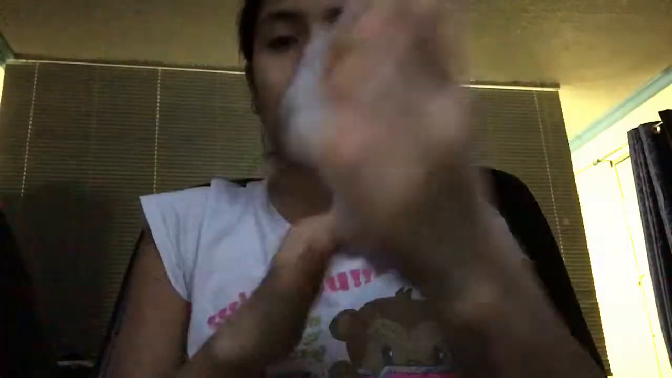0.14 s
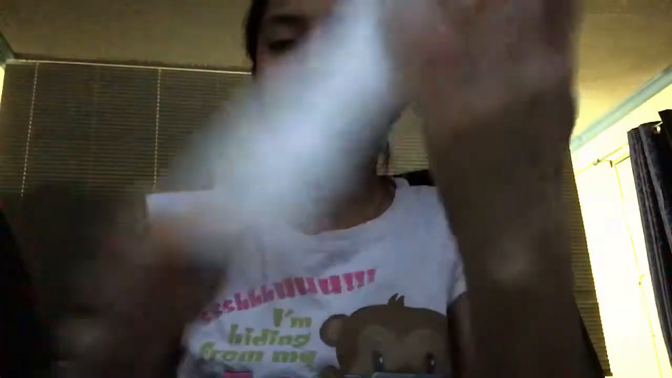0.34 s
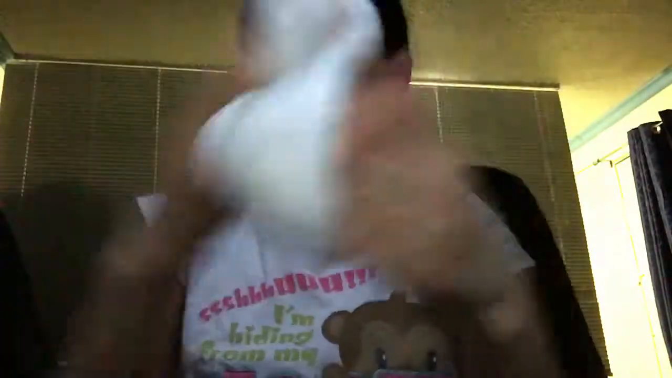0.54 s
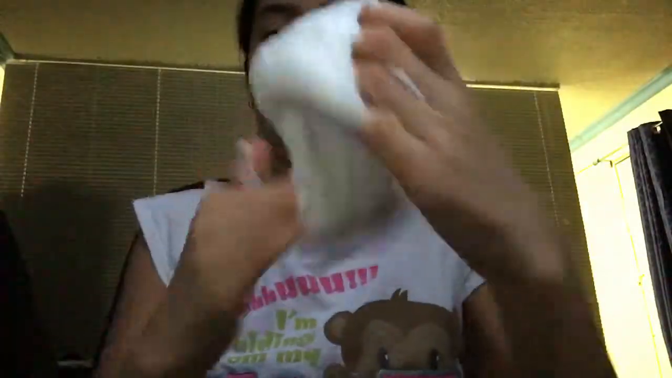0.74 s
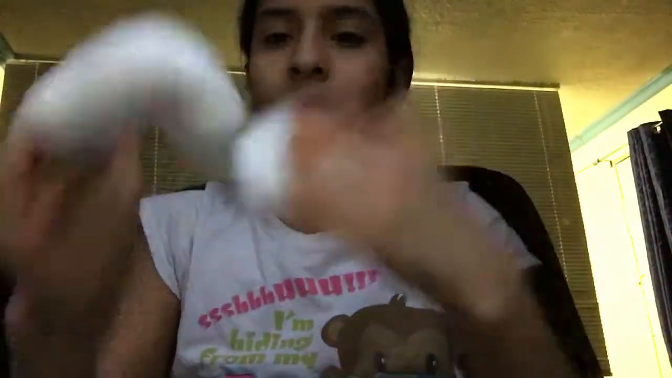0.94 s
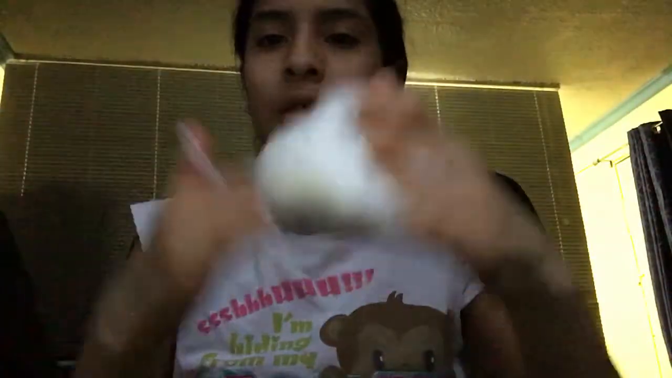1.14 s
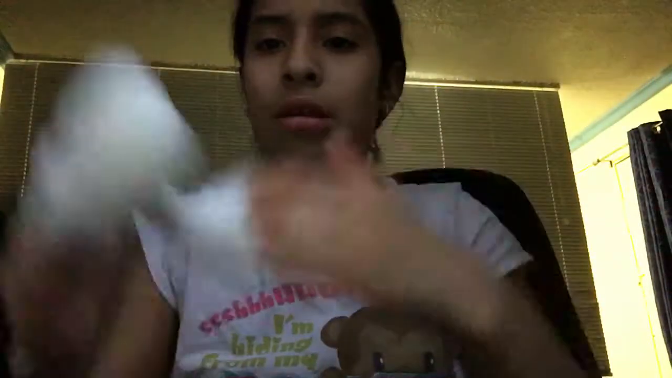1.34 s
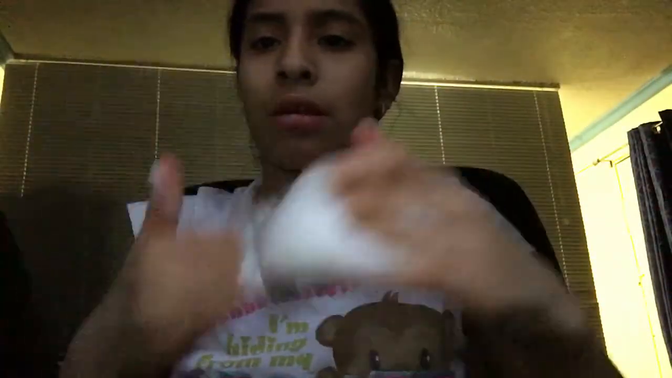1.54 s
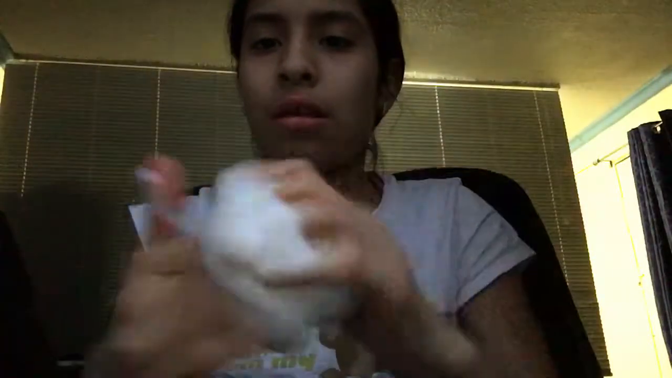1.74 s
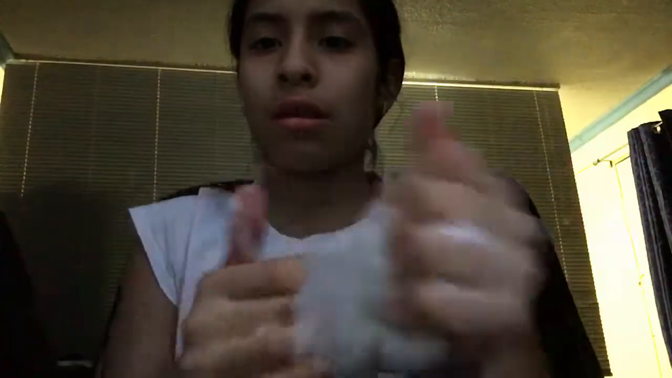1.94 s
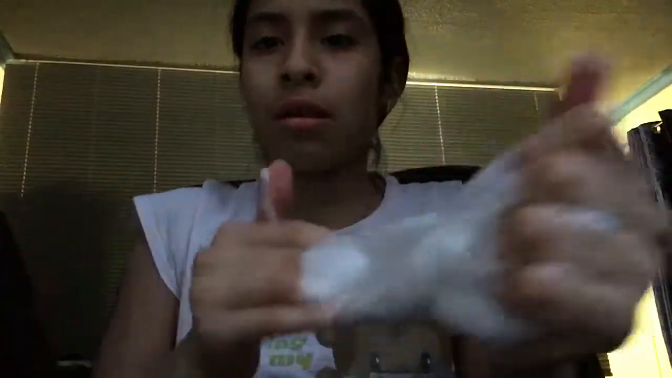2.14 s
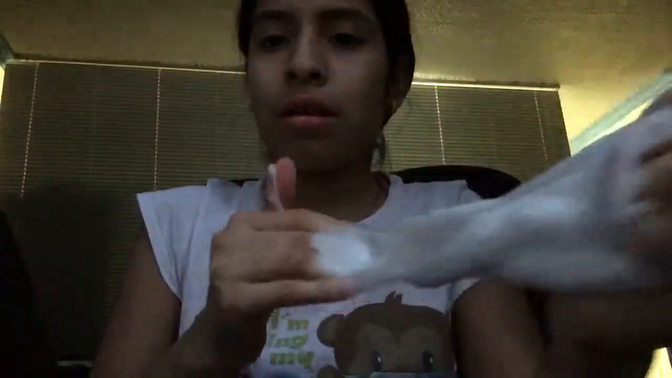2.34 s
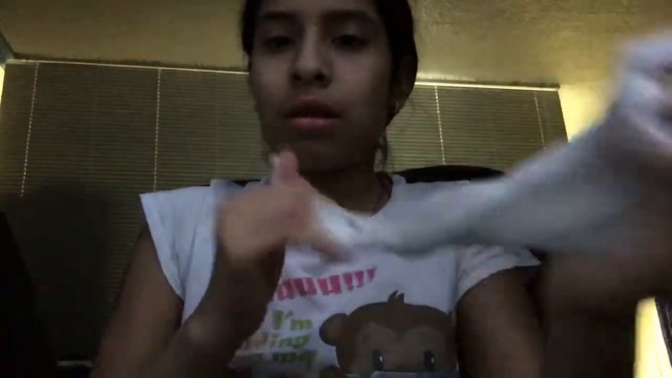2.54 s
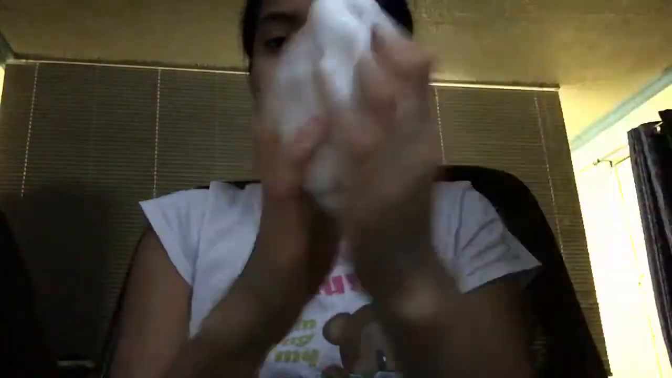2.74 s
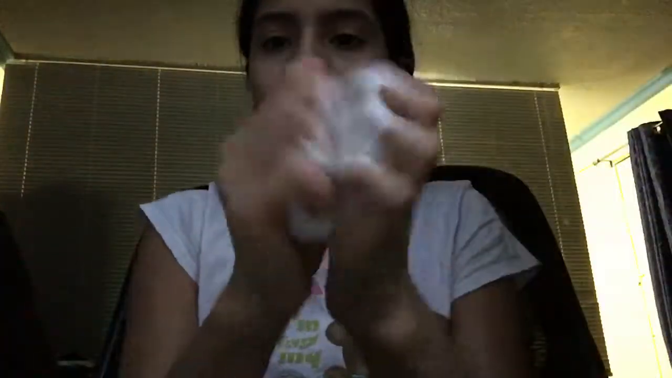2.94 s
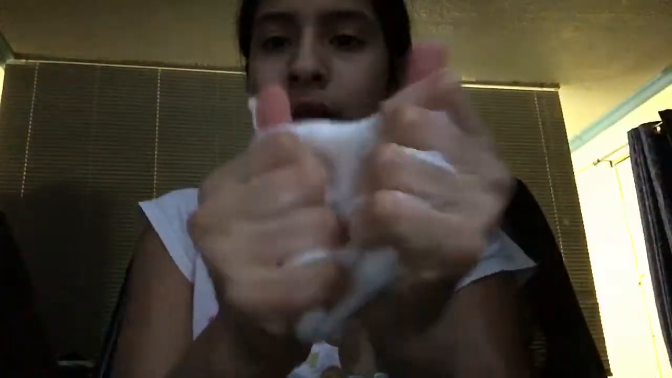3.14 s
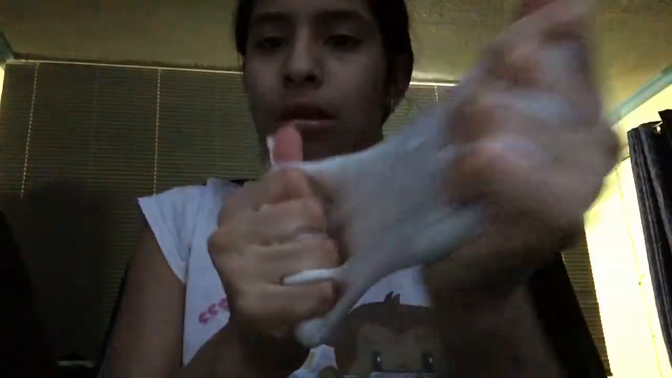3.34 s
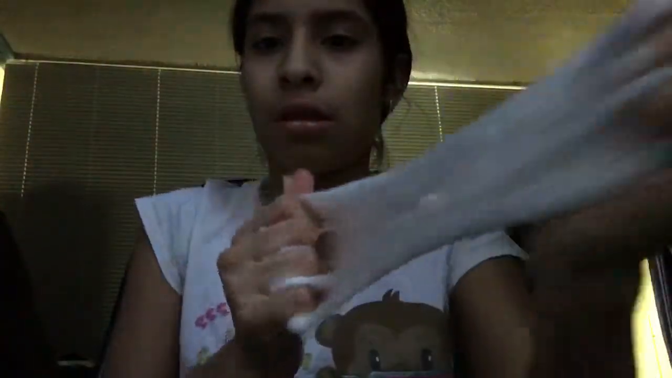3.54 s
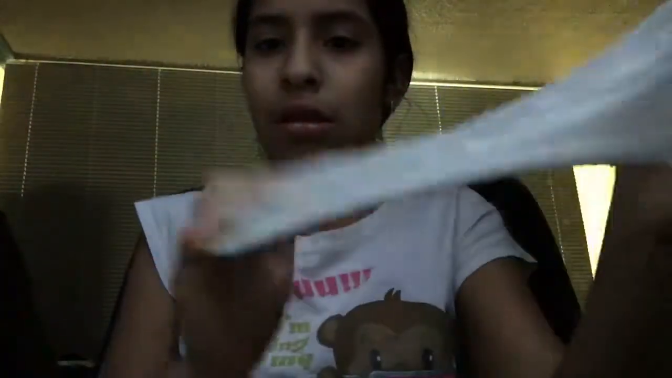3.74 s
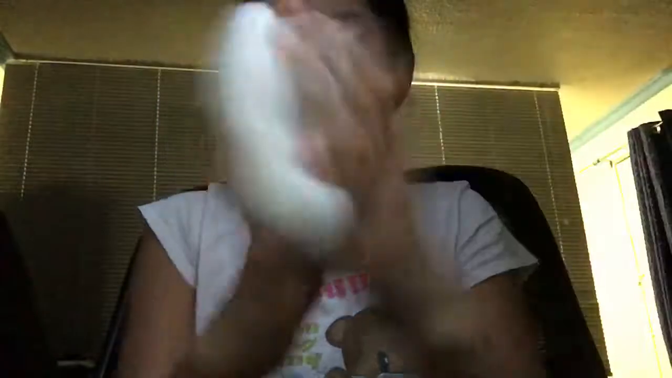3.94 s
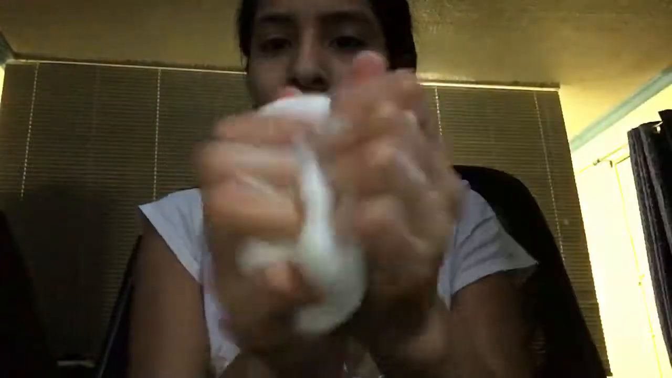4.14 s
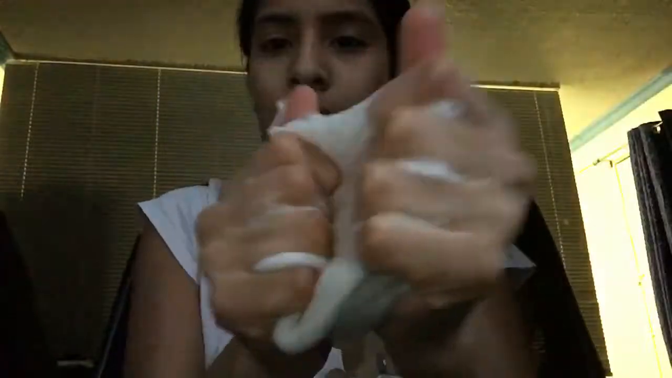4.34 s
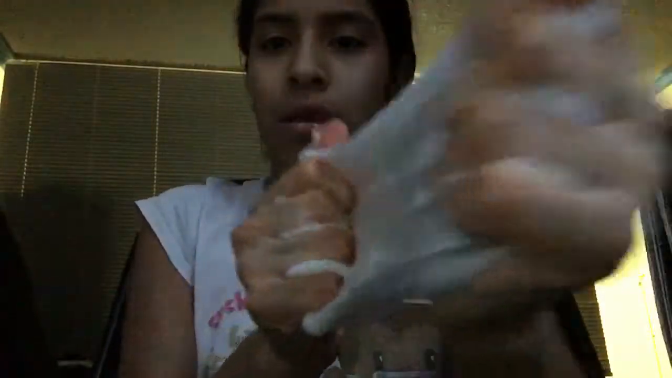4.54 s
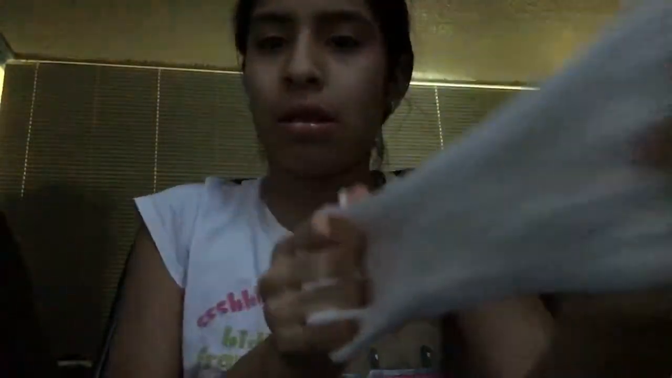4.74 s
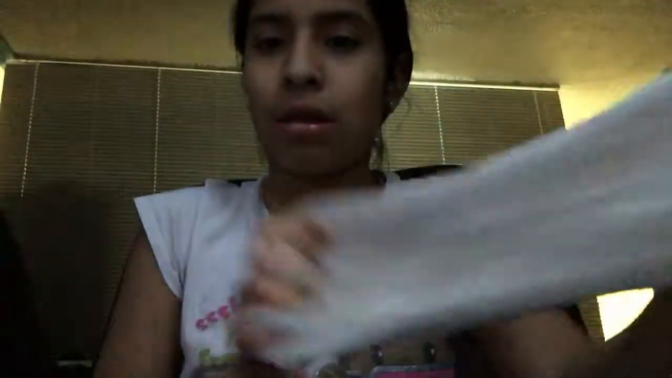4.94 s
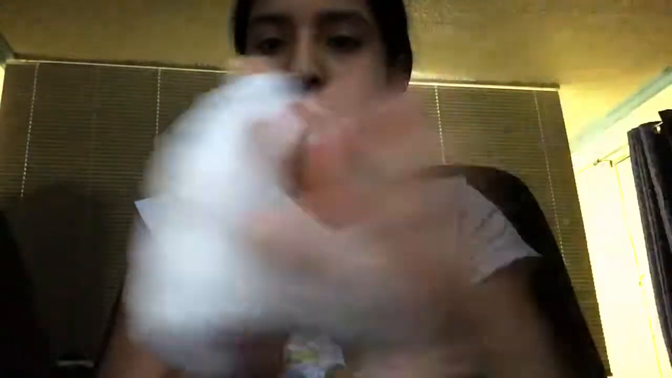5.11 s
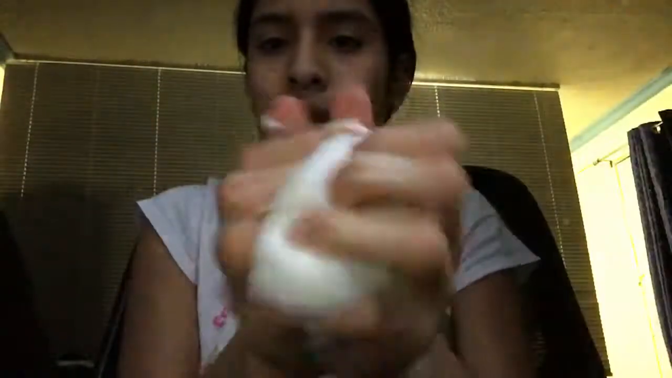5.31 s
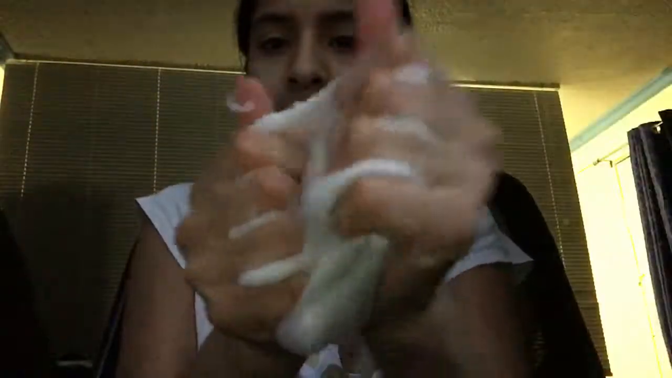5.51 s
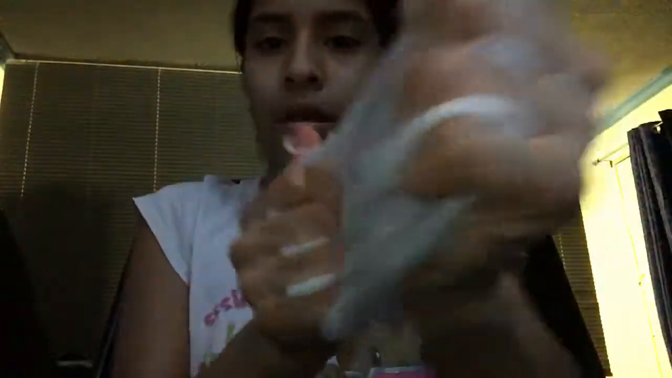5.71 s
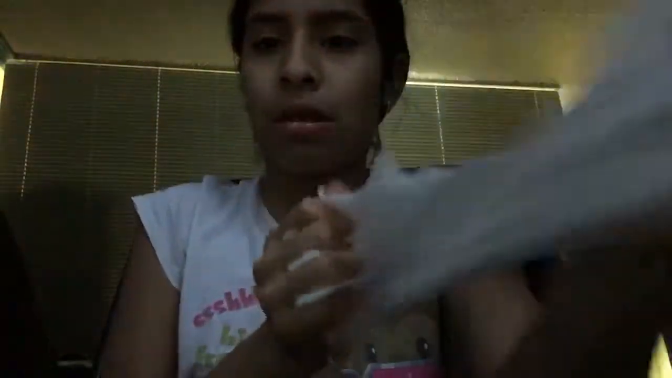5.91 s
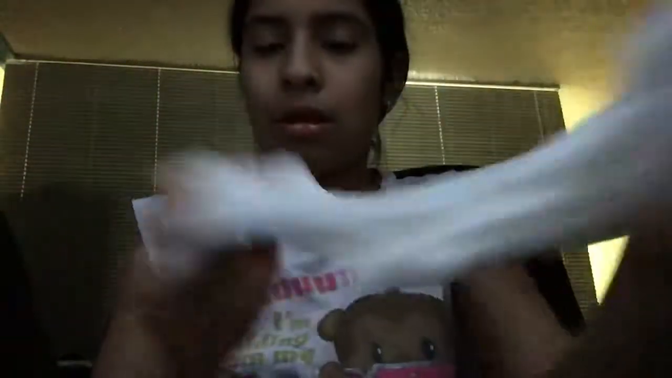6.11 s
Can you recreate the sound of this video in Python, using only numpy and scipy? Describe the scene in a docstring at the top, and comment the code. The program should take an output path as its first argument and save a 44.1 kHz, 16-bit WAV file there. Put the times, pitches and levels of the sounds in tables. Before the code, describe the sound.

Close to the microphone in a small furnished room, hands knead airy slime. Quick soft squishes and fizzes come first, with a brief stutter near the start, then a run of small pops, a quieter pull, and stronger crackling stretches. Loud wet claps with snapping bubbles and squirting air burst out in the second half, over a faint low rumble.

```python
"""A soft fizz and squish of squeezed foam over a low room rumble, with sharp pops and squirts throughout.
Foamy slime is folded, squeezed, pulled out and clapped together by hand, close to a microphone in a small room.
The sound stutters briefly near the start.
Foam is dense trains of tiny ringing bursts under force envelopes; pops are a film click plus a ringing cavity.
Squirts and blowouts mix a flapping tone, resonant air noise and spray; background is noise and wavering tones."""
import sys
import numpy as np
from scipy import signal
from scipy.fft import irfft
from scipy.io import wavfile
from scipy.ndimage import uniform_filter1d

SR = 44100
rng = np.random.default_rng(int(sys.argv[2]) if len(sys.argv) > 2 else 0)


def inscribe(sig):
    """Save sig as 16-bit PCM at rate SR to the path in sys.argv[1].

    A 1-D sig is mono; a 2-D sig holds one channel per row.
    Samples are clipped to [-1, 1] before scaling.
    """
    pcm = np.round(np.clip(np.atleast_2d(sig).T, -1, 1) * 32767)
    wavfile.write(sys.argv[1], SR, pcm.astype(np.int16))


N = 272097

# rumble spectrum: freq_hz, relative_db_per_hz
RUMBLE_SPECTRUM = [(15, -46), (30, -3), (45, -2), (75, 0.5), (135, -1.5), (195, -8), (270, -9.5),
                   (340, -12), (430, -19), (650, -27), (1500, -40)]
# hiss spectrum: freq_hz, relative_db_per_hz
HISS_SPECTRUM = [(300, 5), (1100, -1), (1700, -10), (2800, 1.5), (5000, -13), (9000, -18), (16000, -19)]
# swell and fade of the low drone: time_s, level_db
DRONE_SWELL = [(0.0, -56), (2.06, -57.5), (2.15, -52), (2.51, -71), (2.8, -49.5), (3.54, -56), (3.57, -63),
               (3.99, -55), (4.04, -48), (4.18, -65), (4.33, -49), (4.36, -65), (4.83, -60), (5.05, -48.5),
               (5.19, -53), (5.22, -42.5), (5.55, -57.5), (6.17, -54)]
# decay of the room tail: freq_hz, t60_s
TAIL_T60 = [(200, .3), (1000, 0.18), (3000, 0.23), (7000, 0.38), (15000, 0.35)]
# colour of the room tail: freq_hz, gain_db
TAIL_COLOUR = [(200, 0.5), (1000, 3.5), (3000, 2.5), (6000, 0.5), (10000, -2), (16000, -11)]
# microphone response: freq_hz, gain_db
MICROPHONE_RESPONSE = [(20, 0), (50, -2.5), (1250, -0.5), (1420, -7), (1600, -3.5), (4300, 1), (4800, -2.5),
                       (5400, 0), (9600, -2.5), (10300, -8), (11200, -3.5), (16000, -2.5)]
# spectrum of the small foam cells: freq_hz, relative_db_per_hz
FIZZ_SPECTRUM = [(600, -20), (1400, 3.5), (2400, 3), (3800, -5), (4800, -6), (6300, -9), (8000, -16.5),
                 (10300, -13), (12500, -19), (16000, -28)]
# spectrum of the large foam cells: freq_hz, relative_db_per_hz
SQUISH_SPECTRUM = [(200, -31), (420, -14.5), (600, -1.5), (800, 1), (1100, -0.5), (1450, 0.5), (2200, -15),
                   (4000, -28), (12000, -48)]
# spectrum of the fine snaps: freq_hz, relative_db_per_hz
CRACKLE_SPECTRUM = [(400, -13), (1200, -18), (3000, 1), (6500, 1.5), (9000, -1.5), (10300, -2),
                    (12500, 1.5), (16000, -0.5)]
# foam that is only held, before the layer trims: fizz_db, squish_db, crackle_db
HELD_LEVELS_DB = [-67.5, -66, -73.5]
# fingers squeeze or fold the foam, before the layer trims: start_s, length_s, fizz_db, squish_db, crackle_db
SQUEEZE_STROKES = [(0, .05, -57, -56.5, -63.5), (0.1, .15, -54.5, -58, -60.5),
                   (0.362, .11, -59.5, -84, -61.5), (0.488, 0.087, -60, -60, -60),
                   (0.617, .09, -59, -54, -62.5), (0.844, .09, -65.5, -59, -66),
                   (0.951, .08, -57.5, -54.5, -63.5), (1.08, .13, -59, -59, -68),
                   (1.211, 0.15, -66, -63.5, -71), (1.361, .12, -61, -56.5, -65.5),
                   (1.489, .1, -59, -60, -67), (1.727, .33, -65.5, -62, -61.5),
                   (2.618, 0.14, -67, -74, -71.5), (2.762, 0.056, -60, -62, -68),
                   (2.956, .11, -63.5, -74, -61), (3.092, .08, -68, -77, -51.5),
                   (3.252, .17, -54, -56.5, -55), (3.631, .12, -58, -62, -56.5),
                   (3.763, .11, -55, -58, -58), (4.017, .1, -54.5, -54, -60),
                   (4.245, .09, -49.5, -58.5, -50), (4.422, 0.085, -48.5, -48.5, -60),
                   (4.533, 0.056, -58.5, -56, -58.5), (4.892, .2, -52.5, -61, -56),
                   (5.221, .12, -62.5, -61, -60.5), (5.598, .22, -60, -56, -72),
                   (5.857, .14, -47.5, -58.5, -56.5), (5.976, .12, -48.5, -55, -53.5)]
# foam is pulled into a sheet, before thinning and trims: start_s, length_s, fizz_db, squish_db, crackle_db
PULL_STROKES = [(2.112, .4, -57.5, -54.5, -68), (3.043, .6, -53, -57, -53.5), (4.232, .66, -50.5, -48, -52),
                (5.435, .5, -50.5, -50.5, -55)]
# decay as the sheet thins: fizz_db_per_s, squish_db_per_s, crackle_db_per_s
THINNING_RATES_DB_PER_S = [8.5, 21.5, 28.5]
# foam level sinks over this span, then jumps back: start_s, end_s
HUSH_SPAN_S = (3.93, 4.5)
# little air squirts from a fold: start_s, length_s, level_db, start_pitch_hz, q
SQUELCH_EVENTS = [(.137, 0.0094, -41, 1300, 2.2), (.138, .014, -49, 2630, 3.5),
                  (0.343, .0075, -53, 1830, 4.1), (0.367, 0.0082, -51, 1980, 5.1),
                  (0.392, .012, -47, 2330, 5), (0.666, .003, -37.5, 885, 9.5),
                  (0.676, 0.0064, -51, 860, 3.3), (1.012, 0.016, -48, 1453, 2.4),
                  (1.092, 0.049, -53.5, 798, 5.6), (1.16, 0.0095, -45.5, 840, 7.4),
                  (1.406, 0.012, -51, 930, 6.9), (1.734, 0.0032, -40, 1510, 0.5),
                  (1.76, 0.0032, -50, 1330, 1.2), (3.044, 0.0068, -43, 388, 2),
                  (3.091, 0.0024, -29.5, 2900, 3.5), (3.158, 0.001, -26, 14500, 4.8),
                  (3.373, 0.0048, -44, 750, 1.3), (3.411, 0.016, -46, 3360, 0.7),
                  (4.2572, .018, -36, 12430, 1.1), (4.262, .0077, -30.5, 6080, 10),
                  (4.414, 0.031, -43.5, 2650, 0.82), (4.415, .0015, -26.5, 11280, 3.6),
                  (4.456, 0.00197, -24.5, 1080, 1.7), (4.575, 0.027, -48.5, 4570, 3),
                  (4.928, .046, -48.5, 3320, 2.6), (5.4817, 0.007, -28, 4950, 1.25),
                  (5.491, 0.0066, -35, 4120, 16), (6.097, .011, -39, 2240, 3.6)]
# individually placed bubbles, before the pop trims: start_s, cavity_db, pitch_hz, film_db
POP_EVENTS = [(.123, -6, 2200, -49), (.2002, -11, 2040, -19), (.2259, -20, 1020, -19),
              (.4597, -10.5, 4320, -25), (.585, -37, 3000, -29), (.691, -10, 2460, -58),
              (.871, -14.5, 2190, -28.5), (.9854, -9.5, 1680, -39), (1.014, -17, 2500, -27),
              (1.1081, -12, 2030, -18), (1.1298, -16, 710, -11.5), (1.1623, -8, 1410, -55),
              (1.3483, -30, 4500, -29), (1.3877, -16, 2380, -16.5), (1.4099, -9, 1120, -24),
              (1.4735, -13, 1680, -37), (1.582, -13, 1860, -18.5), (1.6798, -18, 1090, -25),
              (1.712, -20, 2220, -26.5), (1.7813, -17, 2160, -17.5), (1.8153, -10.5, 2020, -34),
              (1.8443, -15.5, 3930, -20), (1.8488, -11, 14000, -17), (1.8973, -12, 1030, -13.5),
              (1.9113, -7.5, 1480, -47), (1.9416, -14, 5270, -25), (1.96, -8.5, 2900, -18.5),
              (1.9787, -3, 7200, -11), (2.0353, -26, 3320, -22.5), (2.0655, -10, 13800, -38),
              (2.0873, -11, 14000, -22.5), (2.1726, -13, 14100, -25), (2.2539, -12, 1230, -8.5),
              (2.3408, -14, 1600, -17.5), (2.8277, -12, 1300, -14), (2.838, -18, 5700, -15.5),
              (3.0084, -13.5, 4530, -45), (3.0416, 6, 1900, -44), (3.0881, -20, 5000, -15),
              (3.0915, -4.5, 2600, -32), (3.1028, -1.5, 2460, -40), (3.1126, -16, 1090, -5),
              (3.1247, -12, 1890, -17), (3.1575, -12, 1780, -13), (3.1683, -23, 860, -18),
              (3.1808, -8.5, 2970, -17), (3.27, -9, 1610, -42), (3.3089, -9, 1870, -20),
              (3.3207, -1, 1570, -13.5), (3.3357, 5.5, 2420, -45), (3.3739, -4, 1110, -45),
              (3.4135, -7, 3340, -40), (3.8368, -9, 2280, -47), (3.871, -14, 1010, -19),
              (4.0323, -7, 1300, -28), (4.1283, -24, 3930, -17.5), (4.1662, -17, 2420, -20.5),
              (4.207, -27, 3900, -23.5), (4.247, -10.5, 4450, -49), (4.2589, 18, 2420, 1),
              (4.2745, -3, 1640, -45), (4.3093, 4, 2220, -3), (4.336, 2, 11600, -45),
              (4.3775, -13, 3510, -10), (4.4548, -7, 1330, -10), (4.4601, -10, 830, -26),
              (4.911, -8.5, 2210, -43), (4.9742, -4.5, 4930, -45), (5.0368, -8.5, 3590, -11.5),
              (5.0553, -6, 6940, -34), (5.2217, 2.5, 1300, -16), (5.2296, 1.5, 1480, -23),
              (5.337, -17.5, 3640, -56), (5.4308, -9, 1160, -37.5), (5.4724, -23, 4100, -17.5),
              (5.9468, -8.5, 677, -17.5), (5.9638, -6, 2870, -40.5), (6.0407, -7, 1395, -41.5),
              (6.1033, -1.5, 1770, -51)]
# fresh fold sets off small bubbles, before spread and pop trims: start_s, length_s, level_db
FLURRY_EVENTS = [(1.741, .3, -16.5), (3.047, .25, -14.5), (4.1, .06, -20.5), (4.271, .16, -10)]
# clap blows out a big air pocket: start_s, length_s, pitch_factor, thud_db, gulp_db, splat_db, spit_db
BLOWOUT_EVENTS = [(4.0218, 0.0075, 1.17, -50, -39, -43, -47), (4.0342, .008, 0.72, -34, -28, -24.5, -35),
                  (4.255, 0.0083, 0.95, -58, -55, -31, -34), (4.3154, .005, 1, -36, -22, -19.5, -11.5),
                  (5.214, 0.0095, 1.1, -44, -31, -30.5, -40.5), (5.227, 0.0077, 0.78, -35, -27, -54, -60),
                  (5.4832, 0.00562, 1, -52, -45, -22, -39)]
# thud, gulp, splat, spit, before the row's factors: delay_s, length_factor, start_hz, end_hz, q
BLOWOUT_GAPS = [(.004, 2.4, 215, 71, 1.4), (.0005, 1.2, 1268, 670, 1.22), (.0003, 1.05, 2498, 1866, 0.82),
                (.0002, .9, 13000, 9500, 2.6)]

RUMBLE_DB, HUM_DB, HISS_DB = -53.5, -64, -65.5
LOWPASS_HZ = 16100
SQUEEZE_ATTACK_S, SQUEEZE_RELEASE_S = .035, .04
PULL_ATTACK_S, PULL_RELEASE_S = .08, .064
HUSH_DB = -13.5
SQUELCH_SINK = .89  # end pitch over start pitch: the pocket widens as it opens
POP_Q_AT_2KHZ, POP_Q_RISE = .57, .71  # smaller cavities ring for more cycles


def gain_of(db):
    """Decibels to gain."""
    return 10 ** (np.asarray(db) / 20)


def evened(x):
    """Scales to rms 1."""
    return x / np.sqrt(np.mean(x ** 2) + 1e-20)


def read(points, hz):
    """Interpolates a table on a log-frequency axis."""
    table_hz, value = np.transpose(points)
    return np.interp(np.log(hz + 1), np.log(table_hz + 1), value)


def add(mix, start_s, sound):
    """Mixes a sound in at start_s."""
    part = mix[max(round(start_s * SR), 0):][:len(sound)]
    part += sound[:len(part)]


def colour(x, points, size=8192):
    """Minimum-phase filter with the given spectrum; clicks keep their sharp front."""
    gain_db = np.maximum(read(points, abs(np.fft.fftfreq(size, 1 / SR))), -100)
    log_gain = np.log(gain_of(gain_db))
    taps = np.fft.ifft(np.exp(np.conj(signal.hilbert(log_gain)))).real
    return signal.oaconvolve(x, taps[:size // 2])[:len(x)]


def resonate(x, hz, width_hz):
    """Resonance that follows the pitch curve hz: shift to zero, smooth, shift back."""
    turn = np.exp(2j * np.pi * np.cumsum(hz * np.ones(len(x))) / SR)
    r = np.exp(-np.pi * width_hz / SR)
    return 2 * (turn * signal.lfilter([1 - r], [1, -r], x / turn)).real


def wavering(hz, drift_hz):
    """Tone of rms 1 whose pitch wanders by drift_hz rms."""
    drift = drift_hz * evened(uniform_filter1d(rng.standard_normal(N), SR // 25))
    return np.sqrt(2) * np.sin(2 * np.pi * np.cumsum(hz + drift) / SR)


def background():
    """Low rumble, swelling drone, steady hum, faint hiss."""
    rumble = gain_of(RUMBLE_DB) * evened(colour(rng.standard_normal(N), RUMBLE_SPECTRUM))
    swell_db = np.interp(np.arange(N) / SR, *np.transpose(DRONE_SWELL))
    drone = gain_of(swell_db) * wavering(hz=60.0, drift_hz=2.74)
    hum = gain_of(HUM_DB) * wavering(hz=254.0, drift_hz=5.33)
    hiss = gain_of(HISS_DB) * evened(colour(rng.standard_normal(N), HISS_SPECTRUM))
    return rumble + drone + hum + hiss


def room(x, tail_db=-22):
    """Faint tail of a small furnished room: noise that decays at its own rate in each band."""
    t = np.arange(SR // 2) / SR
    noise = rng.standard_normal(len(t)) * (t > .005)
    hz, frame_s, z = signal.stft(noise, SR, nperseg=256)
    z *= gain_of(read(TAIL_COLOUR, hz)[:, None] - 60 * frame_s / read(TAIL_T60, hz)[:, None])
    tail = signal.istft(z, SR, nperseg=256)[1][:len(t)]
    return x + gain_of(tail_db) * signal.oaconvolve(x, tail / np.linalg.norm(tail))[:N]


def scatter(x, near_db=-7.5, near_s=.0036, move_s=.13, count=7):
    """Quick reflections off hands and desk; a cycle of patterns crossfades as the hands move."""
    t, out = np.arange(SR // 25) / SR, x.copy()
    for k in range(count):
        taps = rng.standard_normal(len(t)) * np.exp(-t / near_s) * (t > .0004)
        away = (np.arange(N) / SR / move_s - k + 1) % count - 1
        share = np.sqrt(np.maximum(1 - abs(away), 0))  # each pose fades into the next
        out += gain_of(near_db) * signal.oaconvolve(x * share, taps / np.linalg.norm(taps))[:N]
    return out


def stutter(x, start_s=.1355, period_s=.0213, count=3):
    """The sound stutters: one short stretch is heard three times over."""
    start = round(start_s * SR)
    piece = x[start:][:round(period_s * SR)]
    out = x.copy()
    out[start:][:count * len(piece)] = np.tile(piece, count)
    return out


def stroke(length_s, attack_s, release_s):
    """Force envelope: the hands take hold, keep up the force and let go."""
    t = np.arange(int((length_s + .5) * SR)) / SR
    return np.minimum(t / attack_s, 1) * np.exp(-np.maximum(t - length_s, 0) / release_s), t


def strain():
    """Levels of fizz, squish and crackle over time: squeezes and pulls add up in power."""
    power = np.ones((3, N)) * gain_of(HELD_LEVELS_DB)[:, None] ** 2
    for start_s, length_s, *levels_db in SQUEEZE_STROKES:
        force, t = stroke(length_s, SQUEEZE_ATTACK_S, SQUEEZE_RELEASE_S)
        for layer, db in zip(power, levels_db):
            add(layer, start_s, (force * gain_of(db)) ** 2)
    for start_s, length_s, *levels_db in PULL_STROKES:
        force, t = stroke(length_s, PULL_ATTACK_S, PULL_RELEASE_S)
        for layer, db, thinning in zip(power, levels_db, THINNING_RATES_DB_PER_S):
            add(layer, start_s, (force * gain_of(db - thinning * t)) ** 2)
    hush = np.interp(np.arange(N) / SR, HUSH_SPAN_S, [0, 1], right=0)
    return np.sqrt(power) * gain_of(HUSH_DB * hush)


def ticks(per_s, spread_db):
    """Random train of one-sample bursts, most small and a few large; per_s may be a curve."""
    size = gain_of(spread_db * np.minimum(rng.exponential(1, N), 4))
    sign = rng.choice([-1, 1], N)
    fires = rng.random(N) < per_s / SR
    return evened(size * sign * fires / np.sqrt(per_s))  # power stays even as the rate varies


def bubbles(per_s, spread_db, low_hz, high_hz, cycles, count=20):
    """Each tiny burst rings briefly at the pitch of its own cell; small cells are higher."""
    bursts, cell, out = ticks(per_s, spread_db), rng.integers(0, count, N), np.zeros(N)
    for k, hz in enumerate(np.geomspace(low_hz, high_hz, count)):
        pole = np.exp((2j * np.pi - 1 / cycles) * hz / SR)  # decays by 1/e in the given cycles
        ring = [1, -2 * pole.real, abs(pole) ** 2]
        out += signal.lfilter([hz, -hz * pole.real], ring, bursts * (cell == k))
    return evened(out)


def foam(fizz, squish, crackle, cells_per_s=3600, snaps_per_s=500, usual_db=-57):
    """Cells tear as slime stretches and peels off skin; strain tears more small cells and sets off more snaps."""
    busy = fizz / gain_of(usual_db)
    small = bubbles(cells_per_s * busy, spread_db=3.0, low_hz=1205, high_hz=12900, cycles=1.47)
    large = bubbles(per_s=1300, spread_db=3.0, low_hz=472, high_hz=2600, cycles=2.1)
    snaps = ticks(snaps_per_s * busy ** 1.2, spread_db=2.5)
    snaps += 1.2 * bubbles(snaps_per_s * busy, spread_db=5.0, low_hz=2500, high_hz=15700, cycles=1.8)
    out = gain_of(1.85) * fizz * evened(colour(small, FIZZ_SPECTRUM))
    out += gain_of(2.0) * squish * evened(colour(large, SQUISH_SPECTRUM))
    return out + gain_of(4.3) * crackle * evened(colour(snaps, CRACKLE_SPECTRUM))


def pop(cavity_db, hz, film_db, snap_hz=5000, cavity_trim_db=-2.08, snap_trim_db=3.0, size=2048):
    """The film snaps with a bright tick and the opened cavity rings for a cycle or two."""
    f = np.fft.rfftfreq(size, 1 / SR) + 1
    q = POP_Q_AT_2KHZ * (hz / 2000) ** POP_Q_RISE
    cavity = gain_of(cavity_db + cavity_trim_db) / (1 + 1j * q * (f / hz - hz / f)) ** 2
    snap = gain_of(film_db + snap_trim_db) * 1j * f / (snap_hz + 1j * f)
    return irfft(cavity + snap)


def pops(crackle, stray_over_crackle_db=36, film_under_db=-12, spread_db=7, low_hz=1600, high_hz=7000, count=70):
    """Placed bubbles, flurries of small ones, and strays that burst by chance, likelier where foam crackles."""
    out = np.zeros(N)
    for start_s, *bubble in POP_EVENTS:
        add(out, start_s, pop(*bubble))
    odds = np.cumsum(np.sqrt(crackle))
    strays = np.searchsorted(odds, rng.random(count) * odds[-1])
    small = [(i / SR, 20 * np.log10(crackle[i]) + stray_over_crackle_db) for i in strays]
    for start_s, length_s, db in FLURRY_EVENTS:
        small += [(start_s + length_s * share, db) for share in rng.random(size=9)]
    for start_s, db in small:
        cavity, film, pitch = rng.uniform(-1.26, 1, size=3)
        hz = low_hz * (high_hz / low_hz) ** ((pitch + 1) / 2)
        add(out, start_s, pop(db + spread_db * cavity, hz, db + film_under_db + spread_db * film))
    return out


def squirt(length_s, db, start_hz, end_hz, q, flap=.66, spray_db=-17, spray_hz=5000,
           attack=.073, ring_s=.015, jitter=.27):
    """Air forces a wet fold open: its lips flap unevenly and drive a pocket whose pitch glides."""
    t = np.arange(int((length_s + ring_s) * SR)) / SR
    air, wobble, spray = rng.standard_normal((3, SR // 8))[:, :len(t)]
    progress = np.minimum(t / length_s, 1)
    hz = start_hz * (end_hz / start_hz) ** progress
    flow = np.minimum(progress / attack, 1) * np.sqrt(1 - progress ** 2)
    unsteady = jitter / np.sqrt(q) * evened(uniform_filter1d(wobble, int(SR / start_hz)))
    lips = evened(flow * np.sin(2 * np.pi * np.cumsum(hz * (1 + unsteady)) / SR))
    width_hz = 2 * start_hz / q
    pocket = evened(resonate(resonate(air * flow, hz, width_hz), hz, width_hz))
    droplets = evened(resonate(spray * flow, spray_hz, 2 * spray_hz))
    sound = evened(flap * lips + (1 - flap) * pocket) + gain_of(spray_db) * droplets
    return gain_of(db) * np.sqrt(length_s * SR / len(t)) * sound


def squelches():
    """Single squirts, each sinking a little in pitch."""
    out = np.zeros(N)
    for start_s, length_s, db, hz, q in SQUELCH_EVENTS:
        add(out, start_s, squirt(length_s, db, hz, hz * SQUELCH_SINK, q))
    return out


def blowouts():
    """A big pocket empties through several gaps almost at once, from a low thud to a high spit."""
    out = np.zeros(N)
    for start_s, length_s, pitch, *levels_db in BLOWOUT_EVENTS:
        for db, (delay_s, stretch, start_hz, end_hz, q) in zip(levels_db, BLOWOUT_GAPS):
            sound = squirt(length_s * stretch, db, pitch * start_hz, pitch * end_hz, q)
            add(out, start_s + delay_s, sound)
    return out


def scene():
    """The worked slime in its room, over the background."""
    fizz, squish, crackle = strain()
    slime = foam(fizz, squish, crackle) + pops(crackle) + squelches() + blowouts()
    return (stutter(room(scatter(slime))) + background())[None]


def record(dry):
    """Microphone colour, then a steep low-pass."""
    coloured = colour(dry[0], MICROPHONE_RESPONSE)
    lowpass = signal.firwin(255, LOWPASS_HZ, window=("kaiser", 9), fs=SR)
    return signal.oaconvolve(coloured, lowpass, "same")[None]


dry = scene()
out = record(dry)
inscribe(out)
```